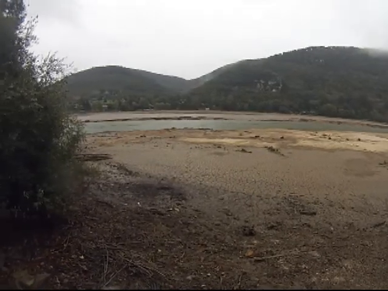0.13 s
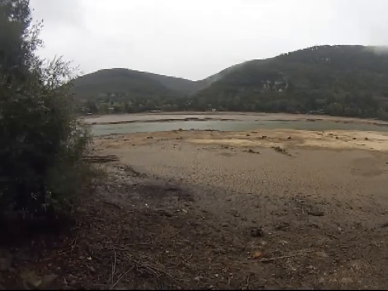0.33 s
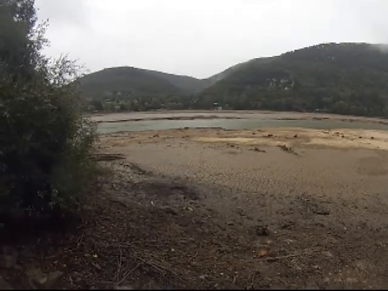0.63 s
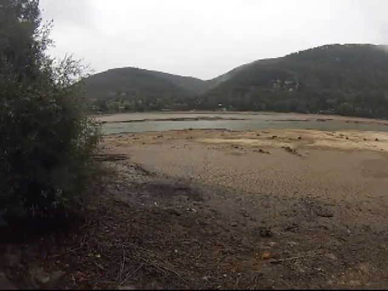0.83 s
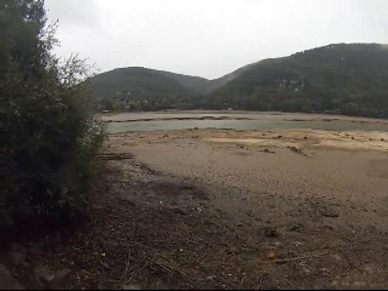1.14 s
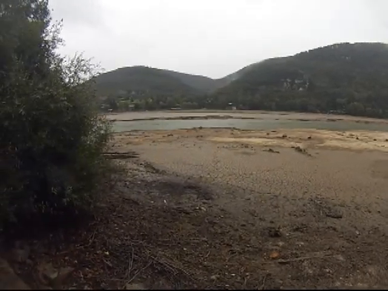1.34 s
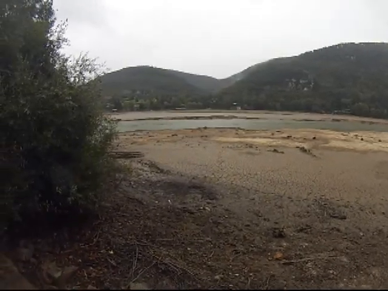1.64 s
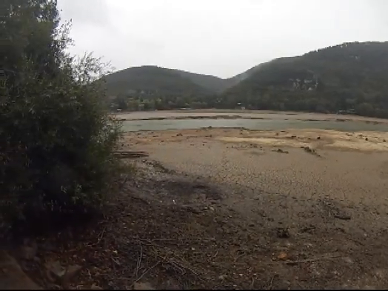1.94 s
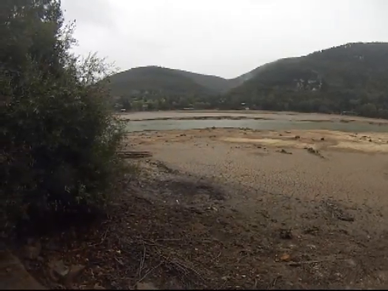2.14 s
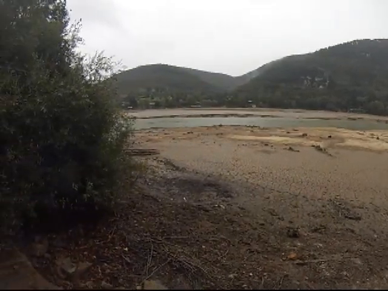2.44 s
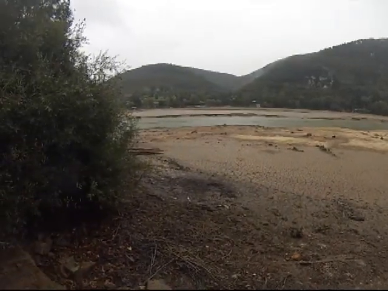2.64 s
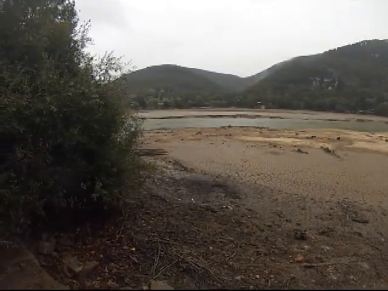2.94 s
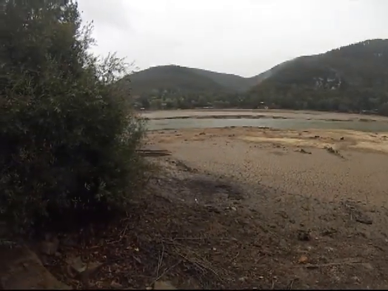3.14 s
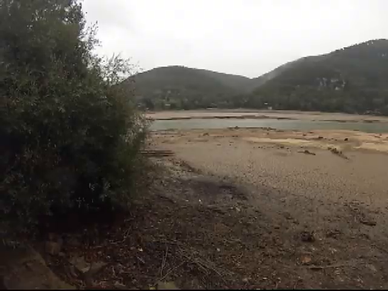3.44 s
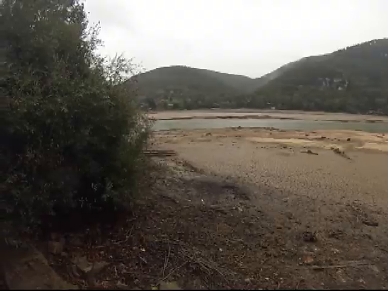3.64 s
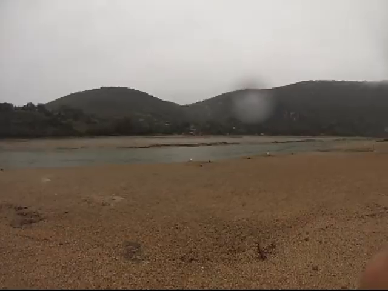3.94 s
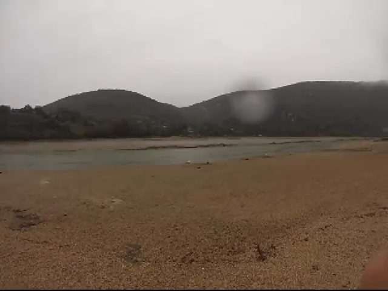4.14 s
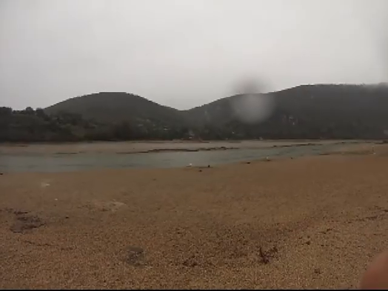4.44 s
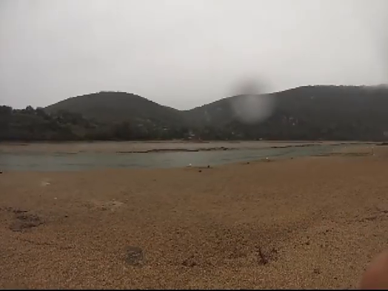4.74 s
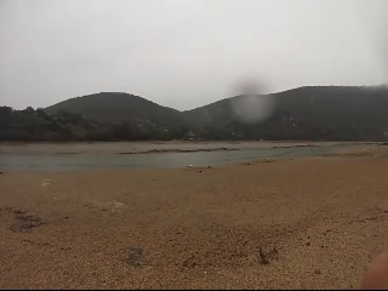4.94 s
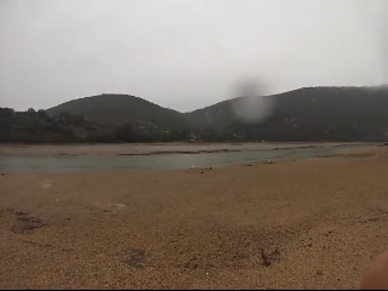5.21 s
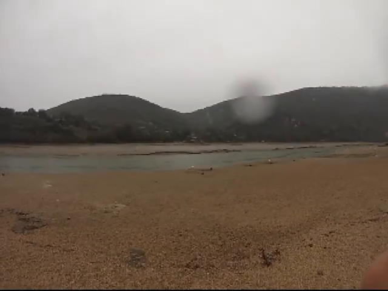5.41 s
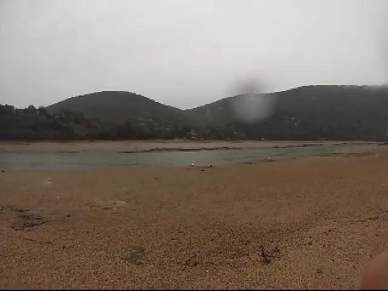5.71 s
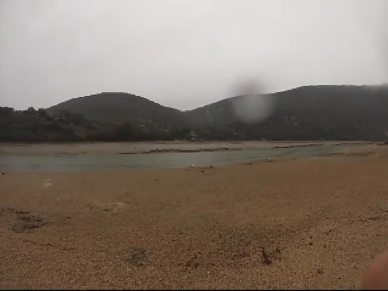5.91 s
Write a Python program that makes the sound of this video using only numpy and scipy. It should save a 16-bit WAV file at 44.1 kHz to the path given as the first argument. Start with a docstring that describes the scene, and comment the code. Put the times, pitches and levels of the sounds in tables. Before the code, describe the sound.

Light rain on an open river bank, heard very close by a small handheld camera. A soft hiss and faint, thinning patter lie under a few dry plastic ticks. A hard drop snaps with a low thump, then a light brush. After a tiny dip, deep wind buffeting rises with more drops, and the hardest one rings a small metal part briefly.

```python
"""Light rain on a river bank, heard by a small camera in the hand; soft hiss (shaped noise) runs throughout. It
opens with wind rumble (slow noise) and a patter that slowly grows fainter throughout; the wind lulls. Drops
strike the plastic case (short dying tones and a noisy snap), a hard one at 2.3 s with a low thump. A light
brush follows at 2.9 s; after a brief level dip at 3.9 s the wind is louder, with more drops, one with a fizz.
The hardest drop lands at 5.1 s and rings a small metal part (longer tones); softer taps follow."""
import sys
import numpy as np
from scipy import signal
from scipy.fft import rfft, irfft
from scipy.io import wavfile
from scipy.ndimage import uniform_filter1d

SR = 44100
rng = np.random.default_rng(int(sys.argv[2]) if len(sys.argv) > 2 else 0)


def materialize(psi):
    """Save the field psi as 16-bit PCM at rate SR to the path in sys.argv[1].

    A 1-D psi becomes a single channel; in a 2-D psi each row is a channel.
    """
    bounded = np.clip(np.atleast_2d(psi).T, -1, 1)
    quanta = np.round(bounded * 32767).astype(np.int16)
    wavfile.write(sys.argv[1], SR, quanta)


N = 267554
TIME = np.arange(N) / SR   # seconds

# Tone colour of the outdoor hiss: (frequency [Hz], relative level [dB per Hz])
AIR_COLOUR = [(53, -5), (90, -0.5), (212, -8), (305, -9), (394, -11.5), (420, -11.5), (851, -15),
              (1030, -17), (1480, -16.5), (2000, -19), (2230, -19), (2700, -21.5), (6230, -29),
              (13500, -39), (15000, -48.5)]
# Stereo width of the hiss: (frequency [Hz], side level minus mid level [dB])
AIR_WIDTH = [(60, -59), (200, -33.5), (400, -23), (1200, -20), (2300, -16.5), (4300, -10), (8000, -7),
             (14000, -21.5)]
AIR_DB = -58   # level of the middle of the hiss: open air and far rain

# Strength of the wind, before the gust trim: (time [s], level [dB])
WIND_STRENGTH = [(0.0, -52.5), (0.45, -50), (1.0, -59.5), (3.4, -57), (3.9, -51), (3.99, -37.5),
                 (4.25, -45), (4.52, -37), (4.75, -43), (6.07, -45.5)]
# Tone colour of the gusty wind, before shading: (frequency [Hz], relative level [dB per Hz])
WIND_COLOUR = [(10, -2.5), (18, -2.5), (32, -6), (46, -11), (65, -16), (90, -26), (200, -54)]
# Tone colour of the steady wind rumble: (frequency [Hz], relative level [dB per Hz])
RUMBLE_COLOUR = [(15, -14), (30, -9), (50, 12), (80, -6.5), (130, -15.5), (300, -38), (1500, -88)]

# Dull low thumps of the case, one of them under the hard drop at 2.3 s, before softening:
# (time [s], level [dB], pitch [Hz], time to fall 60 dB [s])
THUMPS = [(1.13, -48, 97, 0.13), (1.615, -39.5, 268, 0.018), (2.2855, -23.5, 160, 0.0067),
          (2.918, -34.5, 224, 0.031), (2.9195, -38, 660, 0.016), (2.9215, -34, 83, 0.082)]
# Tones of the small metal part: (pitch [Hz], relative level [dB], time to fall 60 dB [s])
METAL_TONES = [(1518, -22, .45), (2514, -9, .13), (3553, -10, .41), (4027, -5, .18), (4199, 0, .13),
               (4538, -7, .27), (4737, -21, .21), (5259, -29, .4)]
# Short bright fizzes, one with a light brush, one with a drop, before filtering:
# (time [s], level [dB], time to fall 60 dB [s])
FIZZES = [(2.923, -55, 0.036), (4.0594, -47.5, 0.11)]

# Drops on the case, and a light brush at 2.92 s; the extra tock is high when a drop lands mid-panel:
# (time [s], relative force [dB], centre pitch [Hz], fall-off [dB per octave], extra tock [dB])
DROPS = [(0.803, -59.5, 1600, 10, -1), (0.8316, -58.5, 1850, 10, 0), (1.1264, -59, 1850, 11, 0),
         (1.1811, -43.5, 2550, 13.5, 9), (1.2711, -30.5, 4080, 10.5, 9), (1.7869, -53, 3150, 15, 2),
         (2.2847, -12, 2670, 21, -2.5), (2.9198, -48.5, 1730, 7.5, -1), (4.0587, -27, 3700, 15, -1),
         (4.095, -46, 2900, 11.5, 4.5), (4.2459, -51, 1770, 12, 0.5), (4.7627, -59, 2450, 16, 4),
         (5.0606, -6, 3010, 23, -7.5), (5.5797, -51, 3800, 16, 2), (6.058, -38.5, 2856, 24, -3)]
# How readily the case gives its knock, tock, clack, tick and snap: (middle pitch [Hz], level [dB])
CASE_RESPONSE = [(1300, 8.5), (2084, 0), (3400, -8.5), (6200, -4), (10600, -1)]
# Case tones from low to high, before small random changes; the decay is that of the fading part alone:
# (pitch [Hz], relative level [dB], time to fall 60 dB [s], polarity at the microphone [+1 or -1])
KNOCK = [(560, -11, .004, 1), (770, -16, .008, -1), (1215, 0, .0095, 1), (1480, -2, .0075, -1)]
TOCK = [(2094, 18, 0.0058, 1)]
CLACK = [(2630, 4.5, 0.0088, -1), (3176, 12.3, 0.0048, 1), (3930, 4.7, 0.0046, -1), (4170, 8.9, 0.0067, -1)]
TICK = [(5320, 9.2, 0.0043, 1), (5890, 0.5, 0.0058, -1), (6600, 4, 0.0042, 1), (7660, 5.1, 0.0035, -1)]

DIP_START_S, DIP_END_S, DIP_DB = 3.874, 3.905, -20
CUTOFF_HZ = 15000


def from_db(db):
    """Turn decibels into a plain multiplier."""
    return 10 ** (np.asarray(db) / 20)


def in_time(rows):
    """Join (time, value) rows with straight lines, one value per sample."""
    return np.interp(TIME, *np.transpose(rows))


def at_hz(points, hz):
    """Read a tone colour between its points, with octaves evenly spaced."""
    knots, values = np.transpose(points)
    return np.interp(np.log(np.maximum(hz, 1)), np.log(knots), values)


def coloured_noise(colour, shade_colour=None):
    """Noise of a given tone colour at unit rms; an optional shade then changes it further."""
    hz = np.arange(N // 2 + 1) * SR / N
    shaped = rfft(rng.standard_normal(N)) * from_db(at_hz(colour, hz))
    shade = 1 if shade_colour is None else from_db(at_hz(shade_colour, hz))
    return irfft(shaped * shade, N) / np.std(irfft(shaped, N))


def low_pass(x, hz, order=2):
    """Weaken what lies above a frequency (Butterworth filter)."""
    sections = signal.butter(order, min(hz, .45 * SR), fs=SR, output="sos")
    return signal.sosfilt(sections, x)


def band_pass(x, low_hz, high_hz, order=2):
    """Weaken what lies outside a frequency band (Butterworth filter)."""
    band = [low_hz, min(high_hz, .45 * SR)]
    return signal.sosfilt(signal.butter(order, band, "band", fs=SR, output="sos"), x)


def unit_hit(x):
    """Give a short sound the energy of 5 ms at unit rms."""
    return x / np.sqrt(np.sum(x ** 2) / (SR / 200))


def burst(t60):
    """Make a tenth of a second of noise that dies away at 60 dB per t60 seconds."""
    t = TIME[:int(1 / 10 * SR)]
    return rng.standard_normal(len(t)) * from_db(-60 * t / t60)


def struck(tones, seconds):
    """A struck body sounds one or more pure tones, each fading at its own speed."""
    t = TIME[:int(seconds * SR)]
    return sum(from_db(db - 60 * t / t60) * np.sin(2 * np.pi * hz * t) for hz, db, t60 in tones)


def add(out, s, sound):
    """Mix a sound in at time s, in seconds."""
    at = int(np.clip(round(s * SR), 0, N - 1))
    out[at:at + len(sound)] += sound[:N - at]


def case_ring(family, detune, pitch=1):
    """A blow spreads through the case: each tone swells, then dies within milliseconds."""
    t = TIME[:int(1 / 10 * SR)]
    ring = 0
    for hz, db, t60, polarity in family:
        off_pitch, off_db = rng.standard_normal(2)   # no two blows ring quite alike
        tone_hz = hz * pitch * (1 + detune * off_pitch)
        swell = t / t60 * from_db(db + off_db - 60 * t / t60)
        ring = ring + np.sign(polarity) * swell * np.sin(2 * np.pi * tone_hz * t)
    return unit_hit(ring)


def drive(force_db, centre_hz, fall_db, tock_db):
    """A blow drives the five case sounds most near its centre pitch, less with every octave away."""
    hz, response_db = np.transpose(CASE_RESPONSE)
    octaves_away = np.abs(np.log2(hz / centre_hz))
    return force_db + response_db - fall_db * octaves_away + [0, tock_db, 0, 0, 0]


def air():
    """Open air and far rain hiss steadily near the centre; microphone noise widens the treble."""
    mid = coloured_noise(AIR_COLOUR)
    side = coloured_noise(AIR_COLOUR, AIR_WIDTH)
    return from_db(AIR_DB) * (mid + side * np.array([[1], [-1]]))   # left and right


def wind(gust_db=-1, rumble_db=-63):
    """Slow air pressure swings press alike on both ports: steady rumble and deeper, gusty eddies."""
    eddies = coloured_noise(WIND_COLOUR, [(3, -25), (10, 0.5), (300, -5), (1500, -40)])
    # even out the level over a fifth of a second, so that the table sets the gusts
    eddies = eddies / np.sqrt(uniform_filter1d(eddies ** 2, size=SR // 5))
    gusts = from_db(in_time(WIND_STRENGTH) + gust_db) * eddies
    rumble = from_db(rumble_db) * coloured_noise(RUMBLE_COLOUR)
    return gusts + rumble


def patter(count=56, loudest_db=-56, range_db=15, thinning_db_per_s=.7, pitch=1.06):
    """Fine drizzle stirs the knock or tock tones at random moments and slowly grows fainter."""
    out = np.zeros(N)
    for when, size, place in rng.random((count, 3)):
        s = when * N / SR
        family = KNOCK if place < 1 / 3 else TOCK
        db = loudest_db - range_db * np.sqrt(size) - thinning_db_per_s * s
        add(out, s, from_db(db) * case_ring(family, detune=.1, pitch=pitch))
    return out


def thumps(soft_hz=600):
    """The case gives dull low thumps: quickly fading tones with their upper part softened."""
    out = np.zeros(N)
    for s, db, hz, t60 in THUMPS:
        thump = struck([(hz, db, t60)], seconds=1 / 5)
        add(out, s, low_pass(thump, soft_hz))
    return out


def metal(level_db=-43, steepness=0.98, dulling_db=1.0):
    """The clack drives the metal part; softer blows ring it less, above all in its upper tones."""
    out = np.zeros(N)
    clacks = [(s, drive(*blow)[2]) for s, *blow in DROPS]
    hardest_db = max(db for s, db in clacks)
    for s, clack_db in clacks:
        softer_db = hardest_db - clack_db
        tones = []
        for hz, db, t60 in METAL_TONES:
            loss_per_db = steepness + dulling_db * (hz > 3800)   # dB lost per dB of softer clack
            tones.append((hz, db - softer_db * loss_per_db, t60))
        add(out, s, struck(tones, seconds=.5))
    return from_db(level_db) * out


def fizzes(low_hz=2000, high_hz=8000):
    """Short bright fizzes of dying noise, one with a light brush, one with a drop."""
    out = np.zeros(N)
    for s, db, t60 in FIZZES:
        fizz = band_pass(burst(t60), low_hz, high_hz, order=1)
        add(out, s, from_db(db) * fizz)
    return out


def drops(level_db=-1, small_db=-52, small_rise=0.087, snap_t60=0.0086,
          snap_low_hz=9000, snap_high_hz=12600, spray_db=-37, spray_t60=0.19):
    """Each blow knocks the case for milliseconds, bursts with a bright snap and leaves a trace of spray."""
    out = np.zeros(N)
    for s, *blow in DROPS:
        *strengths_db, snap_db = drive(*blow)
        pitch = 1 + small_rise * (max(strengths_db) < small_db)   # the smallest drops tick a little higher
        hit = 0
        for family, db in zip((KNOCK, TOCK, CLACK, TICK), strengths_db):
            hit = hit + from_db(db) * case_ring(family, detune=.008, pitch=pitch)
        snap = band_pass(burst(snap_t60), snap_low_hz, snap_high_hz, order=3)
        hit = hit + from_db(snap_db) * unit_hit(snap)
        spray = burst(spray_t60)
        spray = spray / np.linalg.norm(spray)
        add(out, s, hit)
        add(out, s, from_db(spray_db) * signal.fftconvolve(hit, spray))   # smear the hit into spray
    return from_db(level_db) * out


def scene():
    """Mix all the layers; only the hiss differs between left and right."""
    return air() + wind() + patter() + thumps() + metal() + fizzes() + drops()


def record(dry):
    """Dip the level briefly once, and cut the top of the treble."""
    dip = from_db(DIP_DB * ((TIME > DIP_START_S) & (TIME < DIP_END_S)))
    smooth_dip = uniform_filter1d(dip, size=64)   # softens its edges
    top_cut = signal.ellip(10, .1, 80, CUTOFF_HZ, fs=SR, output="sos")
    return signal.sosfilt(top_cut, dry * smooth_dip)


dry = scene()
out = record(dry)
materialize(out)
```